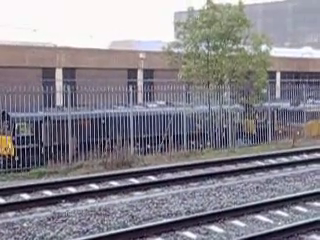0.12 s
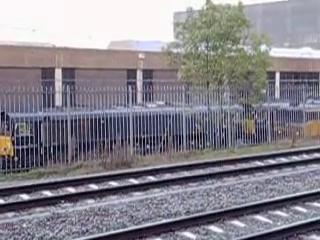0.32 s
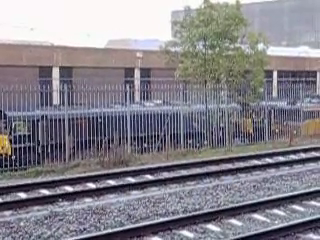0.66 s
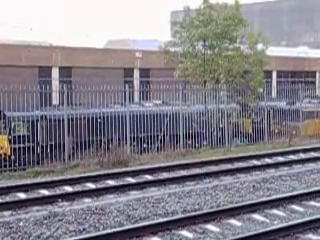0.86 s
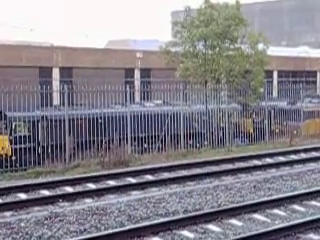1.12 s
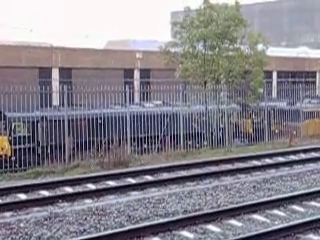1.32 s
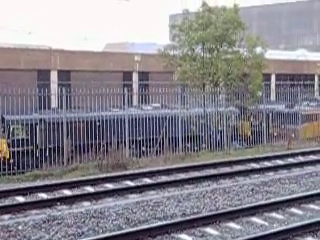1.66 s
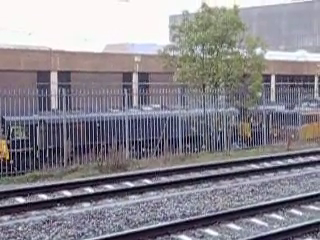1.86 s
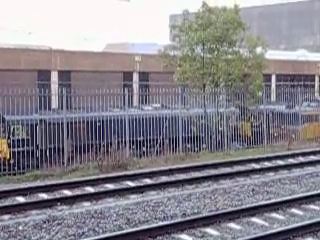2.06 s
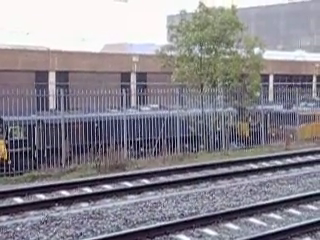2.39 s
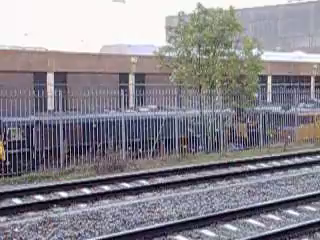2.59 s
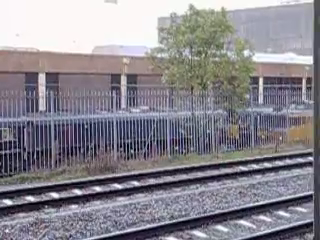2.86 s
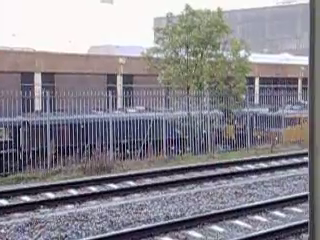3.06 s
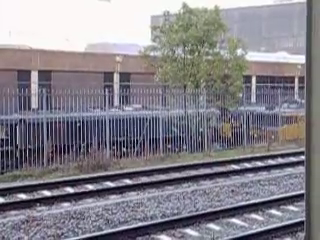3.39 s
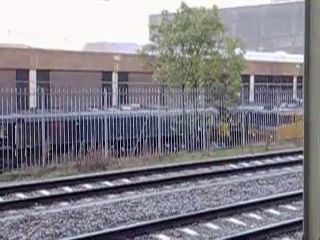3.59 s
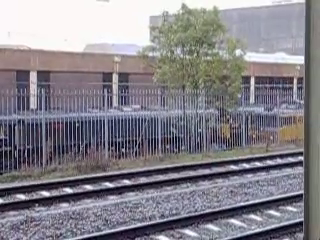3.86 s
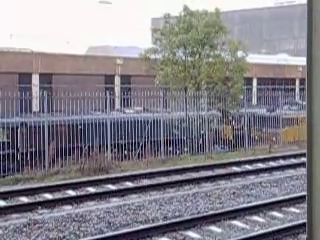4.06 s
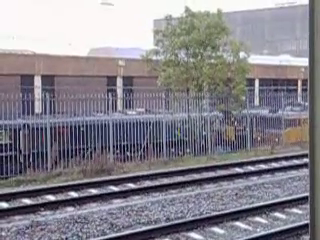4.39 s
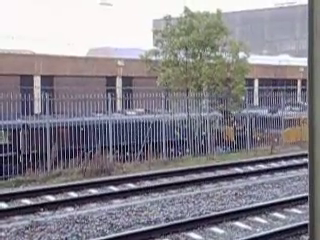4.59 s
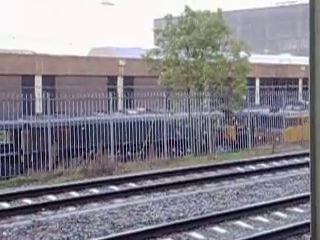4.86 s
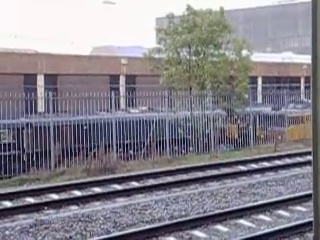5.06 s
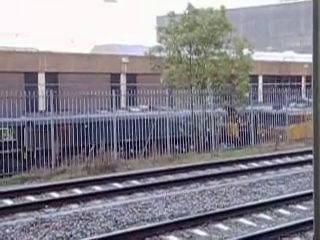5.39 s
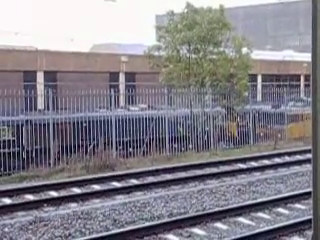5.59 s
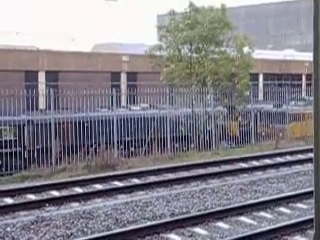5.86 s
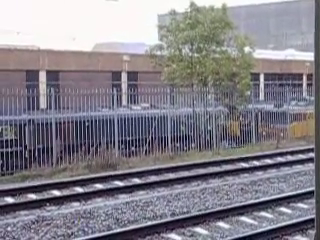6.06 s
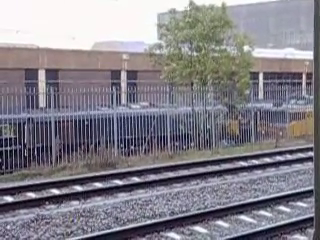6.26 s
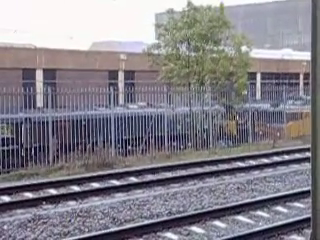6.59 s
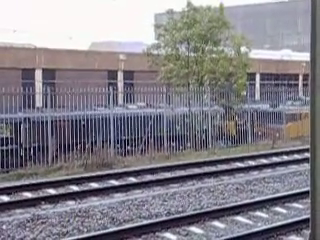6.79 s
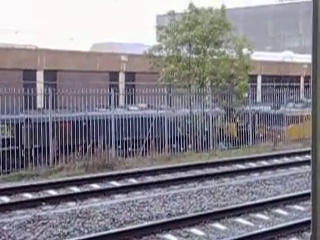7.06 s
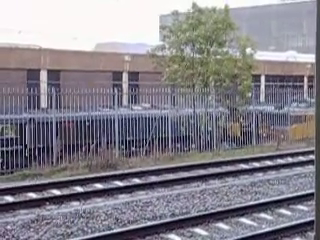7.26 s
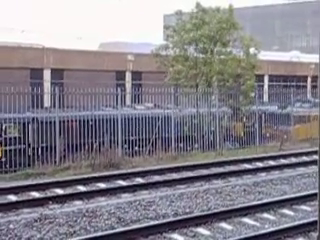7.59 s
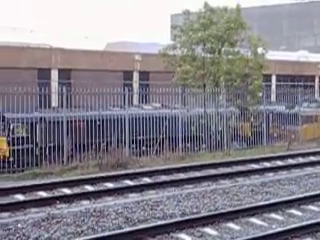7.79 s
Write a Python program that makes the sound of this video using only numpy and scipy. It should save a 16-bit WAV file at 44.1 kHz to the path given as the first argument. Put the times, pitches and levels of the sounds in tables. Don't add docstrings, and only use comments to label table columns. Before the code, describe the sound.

A diesel locomotive idles with a fast, looping knock and thin whine while gusts thump a cheap microphone, then calm after a deep dip.

```python
import sys
import numpy as np
from scipy import signal
from scipy.fft import rfft, irfft, next_fast_len
from scipy.io import wavfile
from scipy.ndimage import uniform_filter1d

SR = 44100
rng = np.random.default_rng(int(sys.argv[2]) if len(sys.argv) > 2 else 0)


def voltage_ratio(level):
    return 10 ** (np.asarray(level, float) / 20)


def dump_mix(stems):
    frames = np.atleast_2d(stems).T
    limited = np.clip(frames, -1, 1)
    pcm = np.round(limited * 32767).astype(np.int16)
    wavfile.write(sys.argv[1], SR, pcm)


N = 349713

TURN_HZ = 5.728
LEAD_S = 1
AIR_DB, CLATTER_DB = -23, -28
RECOVER_DB_S, HOLD_S = 14, .08
OFFSET, FULL_SCALE = -.36, .716
PLAYBACK_HZ = 4135

# frequency in Hz, density in dB per Hz.
AIR_SPECTRUM = [(25, -6), (60, -1.5), (110, -5), (200, -12.5), (330, -12.5), (480, -14.5), (700, -11.5),
                (900, -15), (1300, -17.5), (1650, -19.5), (2050, -17), (2600, -20), (3300, -21),
                (3900, -28)]
# frequency in Hz, density in dB per Hz.
CLATTER_SPECTRUM = [(700, -33), (1000, -2.5), (1350, -1.5), (1600, -6.5), (2050, 0), (2500, -8.5),
                    (3500, -16)]
# time in seconds, level in dB, eddy pitch in Hz.
GUSTS = [(0.0, -28, 100), (0.09, -26, 98.5), (0.17, -32.5, 100), (0.35, -22.5, 99), (0.4, -32.5, 100),
         (0.49, -20, 100), (0.53, -24, 99), (0.56, -14, 100), (0.61, -9, 100), (0.65, -23.5, 99.7),
         (0.79, -17, 100.1), (1.06, -17.5, 100), (1.26, -14, 99.6), (1.3, -25.5, 100), (1.32, -14, 98),
         (1.5, -20, 99.8), (1.63, -26.5, 100.7), (1.67, -18.5, 99), (1.72, -22, 100.7), (1.8, -17, 101),
         (1.94, -29, 100.4), (2.02, -19, 100), (2.08, -29.5, 100), (2.11, -17, 101), (2.25, -12, 101.2),
         (2.45, -15.5, 100.7), (2.51, -22, 100), (2.55, -11, 100), (2.62, -18.5, 100.5), (2.75, -11, 101.3),
         (2.79, -25.5, 100), (2.89, -9.5, 100), (2.95, -16.5, 101.2), (3.03, -26.5, 100.4),
         (3.09, -10, 100), (3.14, -32.5, 100), (3.17, -29.5, 100), (3.42, -27, 99), (3.45, -17.5, 100),
         (3.52, -25.5, 100.5), (3.54, -10.5, 99.4), (3.6, -22.5, 100), (3.68, -17.5, 99.4),
         (3.82, -27.5, 100.6), (3.89, -21.5, 100), (4.08, -15.5, 100.8), (4.18, -15, 99.7),
         (4.26, -55.5, 100), (4.42, -39, 100), (4.45, -59, 101), (4.73, -55, 100), (4.8, -37, 101.2)]
# frequency in Hz, density in dB.
DEEP_EDDIES = [(20, -13.5), (45, -1.5), (80, -3.5), (130, -7), (250, -26)]
SHARP_EDDIES = [(30, -15.5), (70, -6.5), (130, -2.0), (230, -4.5), (400, -15), (700, -39.5)]
# time in seconds, peak in dB, length in ms.
WIND_POPS = [
    (0.606, -1.5, 2.9),
    (.615, -9.5, 4),
    (2.264, -2.5, 4),
    (2.558, -3.5, 3.5),
    (2.564, -2, 3.1),
    (3.085, -2, 3.7),
    (4.1709, 1.5, 3.5),
]
# time in seconds, depth in dB.
GAIN_DROPS = [
    (.62, -2.5),
    (2.22, 1.5),
    (2.565, 4.5),
    (3.089, 2.5),
    (4.172, 24),
]
# multiple of the crank turn, level in dB.
GEAR_TONES = [(237, -43), (316, -42.5), (342, -46), (395, -48), (470, -46.5)]
# pitch in Hz, level in dB, swing once a turn in Hz, throb in dB, crank angle of the
# throb in degrees, flutter in dB.
BLOWER_TONES = [(3048, -33, 14, 4.5, 125, 3), (3350, -47.5, 14, 5, 140, 2)]
# time in seconds, level in dB.
BLOWER_SWELL = [(0, 2), (1, -0.5), (1.7, 3.5), (2.4, -2), (3, -2.5), (3.6, 2), (4.5, -2), (5.5, 0),
                (6.3, 1), (7, -3), (7.9, -3.5)]
# crank angle in degrees, level in dB.
EXHAUST_PUFFS = [(1, -10.5), (38, -12.5), (68, -12.5), (187, -10.5), (203, -8.5), (215, -11), (242, -9.5),
                 (304, -15)]
# frequency in Hz, level in dB, t60 in seconds, push +1 or pull -1.
SILENCER_MODES = [(39.9, 0.5, 0.044, -1), (52.35, -7.5, 0.496, 1), (63.8, -14.5, 0.6, 1),
                  (76.1, -7, 0.6, 1), (92.7, -10.5, 0.6, -1), (136.8, -5.5, 0.02, 1),
                  (228.8, -23.5, 0.65, 1)]
# crank angle in degrees, blow in dB on the hood, on the exhaust pipe, on the block.
CYLINDERS = [(-4.5, -1, -11.5, -4.5), (32, -4, -8.5, -2), (58.5, -1, -10, -30.5), (86, -29.5, -15, -4),
             (118.5, -3, -22, -6), (148.5, -3, -7, -1), (179, -1.6, -15, -18), (205, -29, -6.5, -1.5),
             (231.5, -19.0, -0.5, -25.8), (257.5, -30.5, -5.5, -5.5), (299, -2.5, -8.5, -30.5),
             (337, -2, -17.5, -31)]
# frequency in Hz, level in dB, t60 in seconds.
HOOD_MODES = [(260, -17.5, 0.03), (343.8, -36.5, 0.5), (360, -30, 0.54), (409.7, -24.0, 0.124),
              (450.7, -27, 0.54), (470.3, -32.5, 0.58), (499.4, -22.5, 0.5), (541.8, -16, 0.052)]
# frequency in Hz, level in dB, t60 in seconds.
PIPE_MODES = [(598.3, -20.5, 0.5), (639.7, -12, 0.04), (678.3, -7.5, 0.33), (689.2, -23.5, 0.61),
              (729, -8.5, 0.061), (746, -6, 0.103), (778.2, -26.0, 0.55), (813.6, -22, 0.56),
              (906, -27.9, 0.56)]
# frequency in Hz, level in dB, t60 in seconds.
BLOCK_MODES = [(1024, -19, 0.013), (1157, -32, 0.401), (1244, -19, 0.016), (1352.5, -39.5, 0.42),
               (1402, -35, 0.041)]


def level(x, db):
    return x * voltage_ratio(db) / np.sqrt(np.mean(x ** 2))


def walk(rate):
    hold = int(SR / rate)
    steps = np.repeat(rng.standard_normal(N // hold + 1), hold)
    return 1.3 * uniform_filter1d(uniform_filter1d(steps, hold), hold)[:N]


def colour(x, spectrum, flicker_db, rate):
    hz, db = np.transpose(spectrum)
    size = next_fast_len(N, True)
    octave = np.log2(np.arange(1, size // 2 + 2) * SR / size)
    bins = rfft(x, size) * voltage_ratio(np.interp(octave, np.log2(hz), db, left=-60))
    out = 0
    for centre in np.arange(np.log2(hz[0]) // 1, min(np.log2(hz[-1]) + 1, 12.5), .5):
        band = irfft(bins * np.clip(1 - abs(octave - centre) * 2, 0, 1), size)[:N]
        out = out + band * voltage_ratio(flicker_db * walk(rate))
    return out


def blows(deg, db, late_ms, scatter_db):
    turns = np.arange(-LEAD_S * TURN_HZ // 1 + 1, N / SR * TURN_HZ)[:, None]
    late, scatter = rng.standard_normal((2, len(turns), len(deg)))
    at = ((turns + deg / 360) / TURN_HZ + LEAD_S + late_ms / 1000 * late) * SR
    strength = voltage_ratio(db + scatter_db * scatter)
    whole = at.astype(int)
    out = np.zeros(N + 2 * LEAD_S * SR)
    np.add.at(out, whole, strength * (1 - at % 1))
    np.add.at(out, whole + 1, strength * (at % 1))
    return out


def ring(clicks, modes, signs):
    out = 0
    for (hz, db, t60), sign in zip(modes, signs):
        pole = np.exp((2j * np.pi * hz - np.log(1000) / max(t60, .01)) / SR)
        feedback = [1, -2 * pole.real, abs(pole) ** 2]
        out = out + sign * voltage_ratio(db) * signal.lfilter([0, pole.imag], feedback, clicks)
    return out[LEAD_S * SR:LEAD_S * SR + N]


def air_hiss(turn):
    firing = voltage_ratio(1.5 * np.cos(2 * np.pi * (12 * turn - .2)))
    return level(colour(rng.standard_normal(N) * firing, AIR_SPECTRUM, 1.3, 12), AIR_DB)


def valve_clatter(turn):
    count = int(SR / TURN_HZ)
    repeat = np.interp(turn % 1 * count, np.arange(count + 1), rng.standard_normal(count + 1))
    return level(colour(repeat, CLATTER_SPECTRUM, 1.2, 5.6), CLATTER_DB)


def gusts(t):
    s, db, hz = np.transpose(GUSTS)
    noise = rng.standard_normal(N)
    deep = level(colour(noise, DEEP_EDDIES, 2.9, 14), 0)
    sharp = level(colour(noise, SHARP_EDDIES, 3.6, 25), 0)
    mix = np.clip((np.interp(t, s, hz) - 50) / 100, 0, 1)
    strength = voltage_ratio(np.interp(t, s, db, right=-70) + 3.5 * walk(45))
    return strength * ((1 - mix) * deep + mix * sharp)


def wind_pops(t):
    out = np.zeros(N)
    for at, peak_db, ms in WIND_POPS:
        u = (t - at) * 2000 / ms
        push = np.exp(-np.minimum(u ** 2, 60))
        suck = 0.39 * np.exp(-np.minimum(.12 * u ** 2, 60))
        out += voltage_ratio(peak_db) * (push - suck)
    return out


def gear_whine(turn):
    out = 0
    for multiple, db in GEAR_TONES:
        strength = voltage_ratio(db + 5 + 2.5 * walk(9))
        out = out + strength * np.sin(2 * np.pi * round(multiple) * turn + 0.48 * walk(6))
    return out


def blower_whine(turn):
    slow_db = np.interp(turn / TURN_HZ, *np.transpose(BLOWER_SWELL))
    out = 0
    for hz, db, swing_hz, throb_db, deg, flutter_db in BLOWER_TONES:
        angle = 2 * np.pi * (turn - deg / 360)
        pitch = hz + swing_hz * np.sin(angle) + 1.5 * walk(1.5) + 6 * walk(60)
        swell_db = db + slow_db + throb_db * np.cos(angle) + flutter_db * walk(45)
        out = out + voltage_ratio(swell_db + 3) * np.sin(2 * np.pi * np.cumsum(pitch) / SR)
    return out


def exhaust():
    deg, db = np.transpose(EXHAUST_PUFFS)
    modes = np.array(SILENCER_MODES)
    out = ring(blows(deg, db, .2, 0.74), modes[:, :3], np.sign(modes[:, 3]))
    band = signal.butter(2, [22, 300], "band", fs=SR, output="sos")
    return signal.sosfiltfilt(band, out)


def knocks():
    deg, *parts = np.transpose(CYLINDERS)
    signs = (-1) ** np.arange(10)
    out = 0
    for db, modes in zip(parts, (HOOD_MODES, PIPE_MODES, BLOCK_MODES)):
        out = out + ring(blows(deg, db, .03, 1.2), modes, signs)
    return signal.sosfilt(signal.butter(2, 120, "high", fs=SR, output="sos"), out)


def ducking(t):
    drops = []
    for s, db in GAIN_DROPS:
        drops.append((t > s) * np.clip(db - RECOVER_DB_S * (t - s - HOLD_S), 0, db))
    return voltage_ratio(-uniform_filter1d(np.max(drops, axis=0), size=90))


def scene():
    t = np.arange(N) / SR
    turn = TURN_HZ * t
    machinery = air_hiss(turn) + valve_clatter(turn)
    whines = gear_whine(turn) + blower_whine(turn)
    engine = machinery + whines + exhaust() + knocks()
    return (ducking(t) * engine + gusts(t) + wind_pops(t))[None]


def top_cut(x):
    return signal.sosfilt(signal.butter(12, 15900, fs=SR, output="sos"), x)


def record(dry):
    low = signal.resample_poly(dry[0] / FULL_SCALE, 80, 441)
    stored = np.clip(np.round((low + OFFSET) * 128), -128, 127) / 128
    smooth = signal.firwin(441 * 40 + 1, PLAYBACK_HZ, window=("kaiser", 9.), fs=SR * 80)
    played = signal.resample_poly(stored, 441, 80, window=smooth, padtype="mean")[:N]
    mix = FULL_SCALE * np.clip(played, -1, 1)[None]
    return top_cut(mix)


dry = scene()
out = record(dry)
dump_mix(out)
```